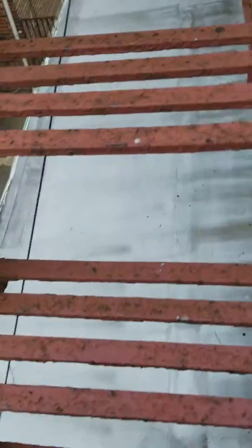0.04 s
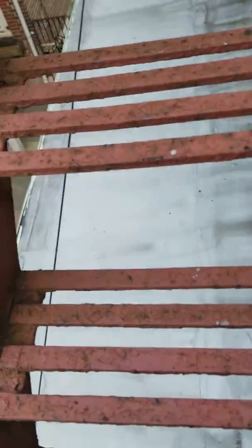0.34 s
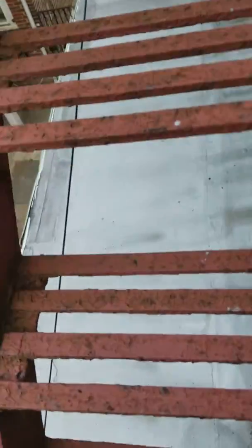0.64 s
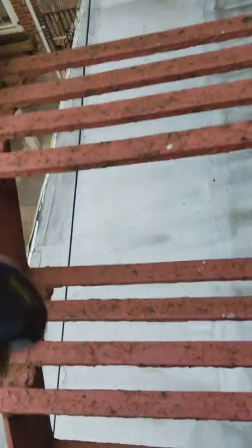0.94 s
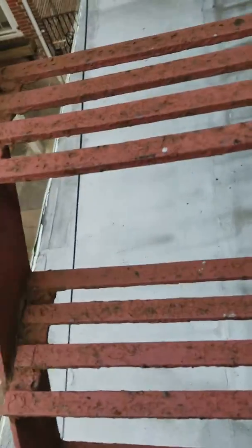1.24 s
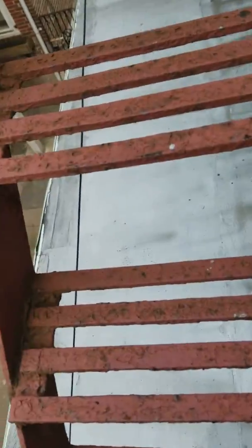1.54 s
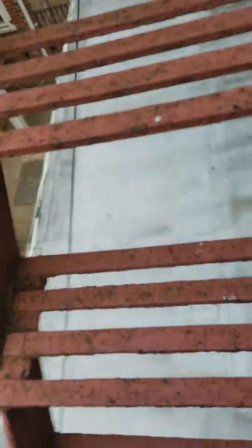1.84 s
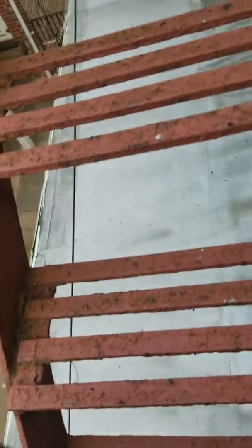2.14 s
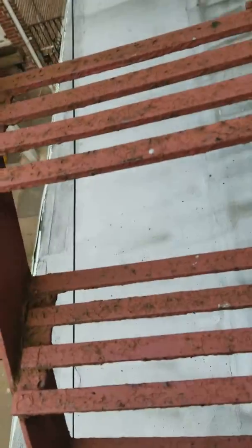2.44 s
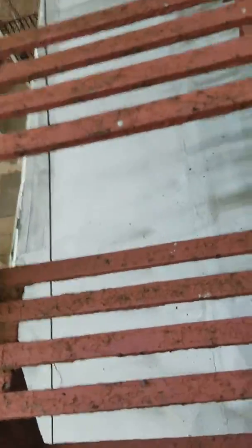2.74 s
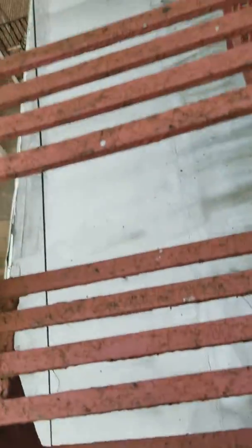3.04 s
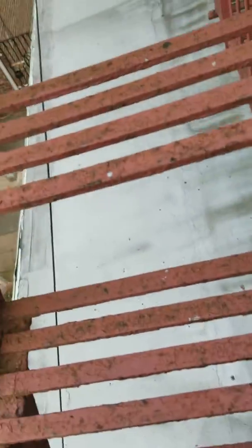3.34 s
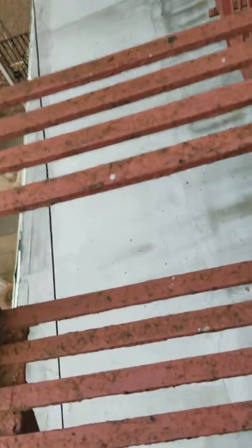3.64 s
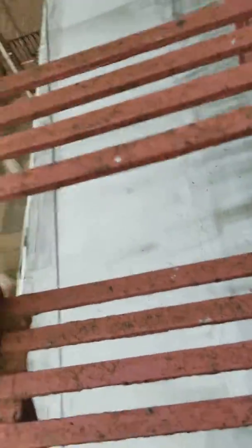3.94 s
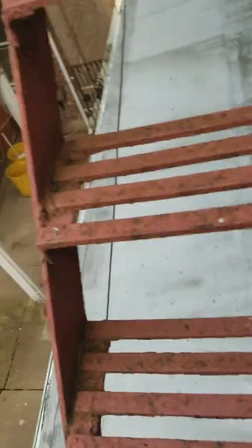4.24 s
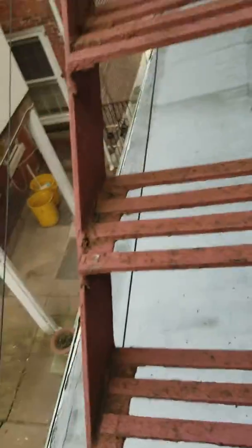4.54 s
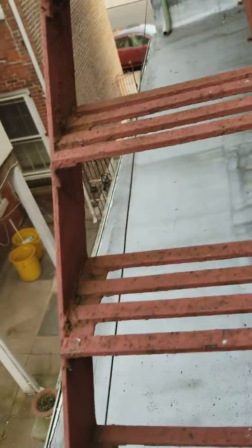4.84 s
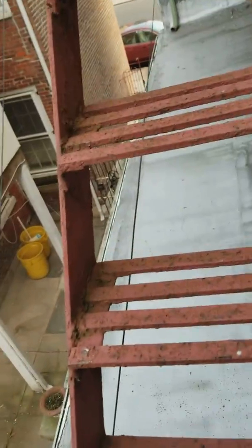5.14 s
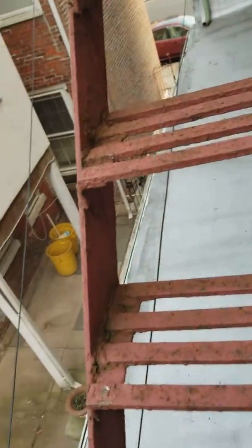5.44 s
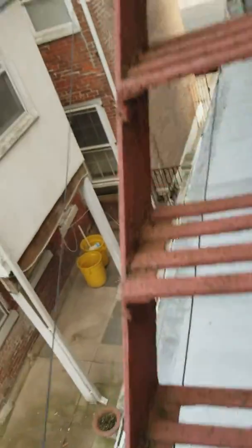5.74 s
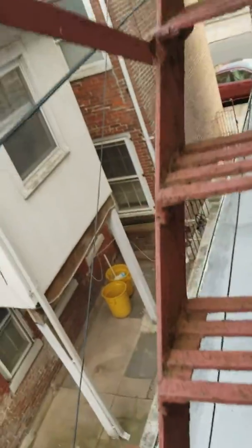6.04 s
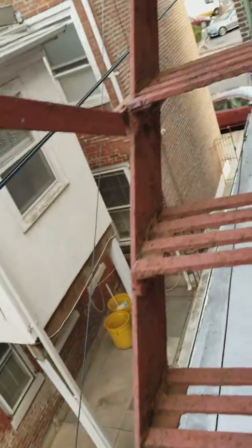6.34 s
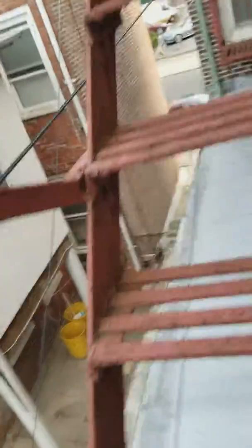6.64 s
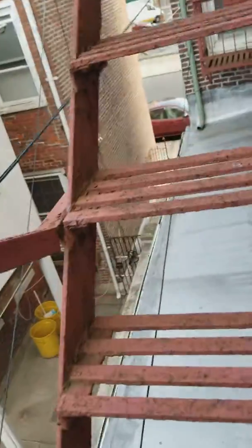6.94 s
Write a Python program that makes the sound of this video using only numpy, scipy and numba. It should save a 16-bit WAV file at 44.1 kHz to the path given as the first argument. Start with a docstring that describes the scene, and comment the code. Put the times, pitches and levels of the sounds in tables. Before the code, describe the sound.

Hard knocks ring out on outdoor steel steps about a second apart, with faint ticking flakes and a low rumble of wind and motors.

```python
"""Traffic and wind rumble behind a back yard, two motors run, and a sleeve brushes near the camera.
From 0.7 s four hard knocks hit a steel fire escape: the step clangs, the frame hums on, the walls answer
and rust flakes tick down. After the first knock the camera turns itself down, the bass most, and one
motor fades. Just after the last knock the other motor pulls away. The volume creeps back about a second
after that knock, and the sleeve rubs again."""
import sys
import numpy as np
from scipy import signal
from scipy.fft import rfft, irfft, next_fast_len
from scipy.io import wavfile
from scipy.ndimage import map_coordinates
from numba import njit

SR = 44100
rng = np.random.default_rng(int(sys.argv[2]) if len(sys.argv) > 2 else 0)


def master_out(mix):
    """Clip the mix to full scale and print it as 16-bit PCM to the path in sys.argv[1]."""
    frames = np.transpose(np.atleast_2d(mix))
    ceiling = np.clip(frames, -1, 1)
    pcm = np.round(ceiling * 32767).astype(np.int16)
    wavfile.write(sys.argv[1], SR, pcm)


N = 313551
T = np.arange(N) / SR
EARS = np.array([[.5], [-.5]])  # splits a time gap: left is half of it early, right half of it late


def amp(db):
    """Turn decibels into a number to multiply by."""
    return 10 ** (np.asarray(db) / 20)


def along(points, hz):
    """Read between the rows of a (pitch, value) table, on a log pitch scale."""
    pitches, values = np.transpose(points)
    return np.interp(np.log(hz + 1), np.log(pitches + 1), values)


def wobble(rate):
    """A smooth random curve with `rate` new values a second."""
    return map_coordinates(rng.standard_normal(1024), [T * rate], mode="wrap")


def ramp(start_s, length_s):
    """Rise from 0 to 1 in a straight line."""
    return np.clip((T - start_s) / length_s, 0, 1)


def swell(t, rise_s):
    """Rise from 0 towards 1, quickly at first."""
    return 1 - np.exp(-t / rise_s)


def fade(t, ring_s):
    """Die away by 60 dB over the ring time."""
    return np.exp(-np.log(1000) * t / ring_s)


def add(track, start_s, sound):
    """Mix a sound into the track at the given time."""
    part = track[:, max(round(start_s * SR), 0):][:, :sound.shape[-1]]
    part += sound[..., :part.shape[1]]


def filtered(x, response):
    """Make some pitches louder or softer than others."""
    size = next_fast_len(N + SR // 2)
    return irfft(rfft(x, size) * response(np.fft.rfftfreq(size, 1 / SR)), size)[:, :N]


def noise(colour, likeness, size, ripple=lambda hz: 1):
    """Stereo noise of average strength 1. Likeness 1 is the same in both ears, -1 is opposite."""
    padded = next_fast_len(size)
    hz = np.fft.rfftfreq(padded, 1 / SR)
    angle = np.arccos(np.clip(along(likeness, hz), -1, 1)) / 2
    weights = amp(along(colour, hz)) * ripple(hz) * np.array([np.cos(angle), np.sin(angle)])
    mid, side = irfft(rfft(rng.standard_normal((2, padded))) * weights, padded)[:, :size]
    stereo = np.array([mid + side, mid - side])
    return stereo / np.sqrt(np.mean(stereo ** 2) + 1e-20)


def ring(tones, t, scatter_db, spread, beat_hz=0):
    """Fading tones, new in strength at each hit. With beat_hz they waver, like many similar bars."""
    out = np.zeros((2, len(t)))
    for hz, db, ring_s in tones:
        phase = rng.uniform(0, 2 * np.pi)
        # high tones reach the two ears more out of step
        phase += min(spread * hz / 1000, 2) * rng.standard_normal((2, 1))
        points = np.exp(2j * np.pi * rng.random(256))
        waver = np.interp(t * beat_hz, np.arange(len(points)), points)
        tone = waver * np.exp(1j * (phase + 2 * np.pi * hz * (t + .0002 * EARS)))
        out += amp(db + scatter_db * rng.standard_normal()) * fade(t, ring_s) * tone.real
    return out


# how alike both ears hear airy sounds: (pitch [Hz], likeness [-1 to 1])
AIR_LIKENESS = [(60, 0.35), (250, .75), (800, 0.28), (2500, 0.11), (10000, 0.091)]
# the tone colour of traffic: (pitch [Hz], level [dB])
TRAFFIC_COLOUR = [(25, -31.5), (70, -17), (150, -1), (330, 0.5), (450, -9.5), (800, -10.5), (1200, -17),
                  (2000, -25), (3500, -35), (8000, -44), (16000, -49)]


def traffic():
    """Traffic blends into a steady, broad rumble."""
    return noise(TRAFFIC_COLOUR, AIR_LIKENESS, N) * amp(-46.5 + 0.67 * wobble(11))


# the tones of the exhaust: (multiple of the firing rate [times], level [dB])
EXHAUST_TONES = [(1, -5), (2, -8.5), (3, -2), (4, -15.5), (5, -13), (6.5, -22), (8, -23)]


def engine(idle_hz=55.9, climb_hz_per_s=2.8, leave_s=4.05, idle_db=-49.5, load_db=14):
    """An engine idles, then pulls away: it fires faster, gets louder under load and fades as it leaves."""
    driving_s = np.maximum(T - leave_s, 0)
    firing_hz = idle_hz + climb_hz_per_s * driving_s
    db = idle_db + load_db * ramp(leave_s, 0.42) - 1.26 * driving_s
    # the upper tones swell and sink every 0.76 s, ever more deeply
    surge_db = 2.5 * driving_s * np.cos(2 * np.pi * (T - 5.728) / .76)
    cycles = np.cumsum(firing_hz * (1 + .004 * wobble(18))) / SR + firing_hz * 0.00056 * EARS
    return sum(amp(db + level + (k > 2) * surge_db + wobble(10)) * np.sin(2 * np.pi * k * cycles)
               for k, level in EXHAUST_TONES)


# the tones of the second motor: (multiple of its lowest pitch [times], level [dB])
DRONE_TONES = [(1, 1), (3, -9.5), (4, -12.5), (5, -17.5)]


def drone(pitch_hz=82.1, hold_s=1.0, fade_db_per_s=15.5):
    """A second motor's low drone wavers, then dies away."""
    db = -38 - fade_db_per_s * np.maximum(T - hold_s, 0)
    cycles = np.cumsum(pitch_hz * (1 + 0.012 * wobble(15))) / SR
    hum = sum(amp(db + level + wobble(9)) * np.sin(2 * np.pi * k * cycles) for k, level in DRONE_TONES)
    return hum * amp([[1], [-1]])  # a little to the left


# the tone colour of wind: (pitch [Hz], level [dB])
WIND_COLOUR = [(10, -28), (30, -12.5), (65, 1.5), (110, -3.5), (200, -19), (500, -49.5), (2000, -88)]


def wind():
    """Wind makes a low rumble with slow gusts."""
    return amp(-48.5 + 2.1 * wobble(2.6)) * noise(WIND_COLOUR, [(30, .6), (100, 1.0)], N)


# the tone colour of sliding cloth: (pitch [Hz], level [dB])
CLOTH_COLOUR = [(100, -50), (1000, -4), (2500, 1.5), (4300, 7), (7000, -0.5), (8500, 4), (10300, -0.5),
                (12000, -2.5), (15500, -3.5)]
# single brushes of the sleeve: (middle time [s], half length [s], level [dB])
BRUSHES = [(0.283, 0.012, -47), (0.406, 0.044, -61), (5.094, .02, -50), (5.391, 0.092, -60),
           (5.977, 0.12, -58.5), (6.294, 0.019, -54), (6.353, .022, -42.5), (6.513, 0.084, -61),
           (6.797, 0.022, -59)]


def sleeve(rub_from_s=5.7):
    """Cloth slides in short strokes with an uneven grip, and rubs softly as the camera turns."""
    rub = ramp(rub_from_s, 0.039) * amp(-63.5 + 0.67 * wobble(13))
    strokes = sum(amp(db) * np.exp(-((T - middle) / half) ** 2) for middle, half, db in BRUSHES)
    grip = amp(1.8 * wobble(82))
    return (rub + strokes) * grip * noise(CLOTH_COLOUR, AIR_LIKENESS, N)


def bar_peaks(spacing_hz, depth_db):
    """Many bars each favour their own pitches: a row of random peaks and dips."""
    heights = rng.standard_normal(4096)
    return lambda hz: amp(depth_db * np.interp(hz / spacing_hz, np.arange(len(heights)), heights))


# how alike both ears hear a knock: (pitch [Hz], likeness [-1 to 1])
KNOCK_LIKENESS = [(150, 0.94), (400, 0.8), (800, 0.15), (1300, -0.23), (4000, -0.026), (12000, -0.04)]
# the tone colour of the crack: (pitch [Hz], level [dB])
CRACK_COLOUR = [(40, -52.5), (200, -24), (800, 0), (2500, -10.5), (4800, -1.5), (7000, -2.5), (9500, -11),
                (13000, -6.5), (15500, -7.5)]


def crack(t, bars):
    """The blow meets the steel: a sharp burst with a faint tail."""
    decay = fade(t, 0.038) + amp(-25) * fade(t, 0.38)
    return amp(12) * noise(CRACK_COLOUR, KNOCK_LIKENESS, len(t), bars) * decay * swell(t, 0.00022)


# the tones of the struck step: (pitch [Hz], width of the peak [Hz], level [dB])
STEP_TONES = [(529, 54, -7), (653, 15, -5.5), (834.7, 32, 2.5), (1274, 96, -12), (1850, 43, -15),
              (2120, 17, -14), (2376, 15, -15), (3020, 35, -11), (3619, 36, -15.5), (3800, 91, -10.5),
              (4270, 50, -7.5), (4780, 33, -20), (5770, 63, -16), (6090, 36, -8)]


def step_clang(t):
    """The step clangs; a tone with a wider peak starts stronger and dies sooner."""
    tones = [(hz, db + 20 * np.log10(width / 50), 1.9 / width) for hz, width, db in STEP_TONES]
    return amp(13.5) * ring(tones, t, scatter_db=0.5, spread=0.61) * swell(t, 0.0014)


# the tones of a bar's edge: (pitch [Hz], level [dB], ring time [s])
EDGE_TONES = [(3990, -1.5, .06), (4500, 0.5, 0.046), (4490, -29.5, .9), (4830, -2.5, 0.078),
              (5320, -1, 0.074)]


def edge_ring(t):
    """A bar struck on its edge rings high and bright."""
    return amp(5.5) * ring(EDGE_TONES, t, scatter_db=1, spread=0.16) * swell(t, 0.00035)


# the tone colour of the clatter: (pitch [Hz], level [dB])
CLATTER_COLOUR = [(59, -38), (100, -17.5), (234, -21.5), (322, -11), (461, -18.5), (524, -5.5), (721, -8.5),
                  (836, -5.5), (1480, -3.5), (1720, -4.5), (2270, -3), (2470, -11), (2860, -5),
                  (4290, -11.5), (16000, -42.5)]


def clatter(t, bars):
    """Many bars ring at once, so close in pitch that they blur into noise."""
    return noise(CLATTER_COLOUR, KNOCK_LIKENESS, len(t), bars) * fade(t, 0.18) * swell(t, .002)


# the long tones of the frame: (pitch [Hz], level [dB], ring time [s])
FRAME_TONES = [(114, -14, 1.4), (144.4, -7, 1.1), (223.7, -12.5, 3.9), (316.8, -6.5, 2.2), (341.6, -1, 1.6),
               (353.7, -1, 1.2), (362.3, 4, 1.5), (386.5, -8, 2.2), (415.8, 5, 0.82), (513, -5.5, 1.4),
               (547.4, -0.5, 1.41), (647, -2.5, 0.95), (806, -1, 0.88), (866, 8, 0.7), (875, -14, 2.3),
               (970, -2.5, 0.37), (1250, -1, .4), (1770, -3, .4), (2060, -1, 0.38), (3280, 3.5, .3)]


def frame_hum(t):
    """The whole frame takes a moment to pick up the blow, then hums on."""
    return amp(-17.5) * ring(FRAME_TONES, t, scatter_db=1, spread=1, beat_hz=9) * swell(t, 0.012)


# the tone colour of the echo at colour_at_s: (pitch [Hz], level [dB])
ECHO_COLOUR = [(47, -64.5), (80, -35), (130, -18.5), (296, -13.5), (346, -7.5), (451, -18), (538, -10.5),
               (588, -15), (858, -9), (1490, -16.5), (1900, -16), (4230, -24.5), (6890, -39), (16000, -47)]
# how long the echo lasts: (pitch [Hz], ring time [s])
ECHO_TIMES = [(120, 2.9), (350, 1.3), (700, 0.67), (2000, 0.58), (5000, .55), (12000, .7)]


def yard_echo(t, bars, colour_at_s=0.17):
    """Stairs and walls throw the sound back in clumps; the low notes last longest."""
    wash = noise(ECHO_COLOUR, KNOCK_LIKENESS, len(t), bars)
    hz, when, bands = signal.stft(wash, SR, nperseg=256)
    decay = fade(when - colour_at_s, along(ECHO_TIMES, hz)[:, None])
    tail = signal.istft(bands * decay, SR, nperseg=256)[1][:, :len(t)]
    clumps = amp(wobble(70)[:len(t)])
    return amp(-17) * tail * clumps * swell(t, 0.038)


# the deep tones of the low thump: (pitch [Hz], level [dB], ring time [s])
THUMP_TONES = [(45, 2, 0.09), (80, -5.5, 0.14), (155, -1, 0.1)]


def thump(t):
    """A low thump as the loud knock overloads the camera, louder on the left."""
    tones = ring(THUMP_TONES, t, scatter_db=2, spread=8.3)
    return amp(-3.5) * tones * swell(t, .0015) * amp([[3], [-4]])


# the blows; the second row is the first one bouncing back:
# (time [s], level [dB], clang [dB], crack [dB], thump [dB], edge ring [dB], clatter [dB])
KNOCKS = [(0.7, -1, -1.5, -7.5, -1.5, -19, 7), (0.727, -11, 8.5, -1.5, -12, -12, 19.5),
          (1.7641, -1.5, 4, -1.5, -17.5, -2, 8.5), (2.7809, -2.5, 2.5, 2.5, -0.5, -13.5, 11),
          (3.8511, -2, 0, 0.5, -14.5, -15.5, 10)]


def knocks():
    """Each blow has its own mix of ringing steel and low thump, and the yard answers."""
    out = np.zeros((2, N))
    t = np.arange(3 * SR // 2) / SR
    bars = bar_peaks(spacing_hz=15, depth_db=3.4)
    for start_s, db, clang_db, crack_db, thump_db, edge_db, clatter_db in KNOCKS:
        blow = (amp(crack_db) * crack(t, bars)
                + amp(clang_db) * step_clang(t)
                + amp(edge_db) * edge_ring(t)
                + amp(clatter_db) * clatter(t, bars)
                + frame_hum(t)
                + yard_echo(t, bars)
                + amp(thump_db) * thump(t))
        add(out, start_s, amp(db) * blow)
    return out * amp([[-.2], [.2]])


def rust_trickle(grains=120, fall_s=.07, lasts_s=1.15):
    """Fine rust trickles down after each blow: many tiny grains and a few larger ones."""
    power = np.zeros((1, N))
    t = np.arange(SR // 20) / SR
    for knock_s, *_ in KNOCKS:
        for wait, size in rng.random((grains, 2)):
            db = -42.5 + 12.5 * size ** 3 - 9.5 * wait  # later grains are softer
            add(power, knock_s + fall_s + lasts_s * wait, (amp(db) * fade(t, 0.015)) ** 2)
    colour = [(100, -50), (2500, -13), (5000, 1), (12000, 1), (16000, -3.5)]  # (pitch [Hz], level [dB])
    return np.sqrt(power) * noise(colour, AIR_LIKENESS, N)


# the tone colour of a flake's bright tick: (pitch [Hz], level [dB])
TICK_COLOUR = [(60, -60), (1500, -23.5), (3500, -4.5), (5200, -4), (7000, -5), (11000, -4.5), (15500, -3)]
# the tone colour of its dull tap: (pitch [Hz], level [dB])
TAP_COLOUR = [(40, -55), (200, -25), (370, 7.5), (600, -5), (1100, -0.5), (2200, -2), (4000, -19),
              (9000, -27)]
# larger flakes landing: (time [s], level [dB], tap compared with tick [dB])
LANDINGS = [(1.113, -54, -17), (1.191, -56, -27.5), (1.231, -40.5, -31), (1.291, -41, -12),
            (1.3112, -41.5, -4), (1.3456, -32.5, -7.5), (2.1848, -36, 11.5), (2.33, -48.5, 4.5),
            (2.381, -46.5, 0), (2.509, -46, -2), (3.307, -45, -13), (3.696, -43, -20),
            (4.337, -43.5, -21.5), (4.458, -45, -7)]


def falling_flakes(light_tap_db=-27):
    """Loose flakes hit the bars one by one: a tick, with a dull tap if heavy or a ping if light."""
    out = np.zeros((2, N))
    t = np.arange(SR // 2) / SR
    decay = fade(t, 0.023) + amp(-15.5) * fade(t, 0.31)  # the bars ring on
    for start_s, db, tap_db in LANDINGS:
        tick = noise(TICK_COLOUR, AIR_LIKENESS, len(t))
        tap = amp(tap_db) * noise(TAP_COLOUR, KNOCK_LIKENESS, len(t))
        ping_db = 7.5 - 2.4 * max(tap_db - light_tap_db, 0)
        ping = amp(ping_db) * ring([(4970, -0.5, 0.012), (5800, -2, 0.015)], t, scatter_db=2, spread=.1)
        add(out, start_s, amp(db + 18) * ((tick + tap) * decay + ping) * swell(t, 0.00044))
    return out


def scene():
    """Everything that reaches the camera."""
    fire_escape = knocks() + falling_flakes() + rust_trickle()
    return fire_escape + traffic() + engine() + drone() + wind() + sleeve()


@njit
def follow(x, rise_s, fall_s):
    """Trail smoothly behind a signal, at one speed going up and another coming down."""
    out, level = np.empty_like(x), 0.0
    for i in range(len(x)):
        level += (x[i] - level) / (SR * (rise_s if x[i] > level else fall_s))
        out[i] = level
    return out


def gain_control(x, depth_db, extra_bass_db, bass_hz, hold_s):
    """Too loud a sound turns the volume down, the bass most; it stays down a while, then creeps back."""
    too_loud = np.abs(x).max(0) > 1
    last_loud_s = np.maximum.accumulate(np.where(too_loud, T, -np.inf))
    holding = (T - last_loud_s < hold_s).astype(float)
    dip = follow(holding, rise_s=0.26, fall_s=0.19)
    bass = filtered(x, lambda hz: 1 / (1 + (hz / bass_hz) ** 4))
    return (x - bass + bass * amp(-extra_bass_db * dip)) * amp(-depth_db * dip)


def limiter(x, ceiling, rise_s, fall_s):
    """Look just ahead and squash sudden peaks; anything still past full scale is cut off."""
    level = follow(np.abs(x).max(0), rise_s, fall_s)
    ahead = np.interp(T + rise_s, T, level)
    return np.clip(x / np.maximum(ahead / ceiling, 1), -1, 1)


# the tone colour of the camera's own hiss: (pitch [Hz], level [dB])
HISS_COLOUR = [(200, 21), (1500, 1.7), (6000, 1), (13000, 1.3), (16000, 5.8)]


def record(dry):
    """The camera tames loud sounds, adds its hiss and drops the very highest pitches."""
    x = gain_control(dry, depth_db=19.5, extra_bass_db=20.5, bass_hz=110, hold_s=1.033)
    x = limiter(x, ceiling=0.77, rise_s=0.00027, fall_s=0.018)
    hiss = amp(-62.5) * noise(HISS_COLOUR, AIR_LIKENESS, N)
    return filtered(x + hiss, lambda hz: np.interp(hz, [15900, 16300], [1, 0]))


dry = scene()
out = record(dry)
master_out(out)
```